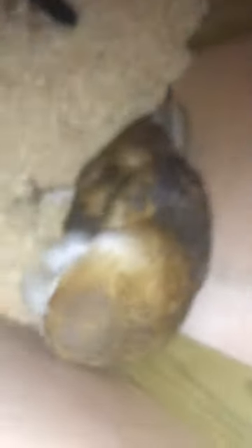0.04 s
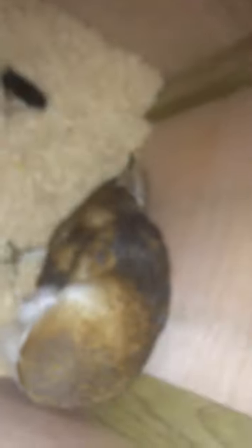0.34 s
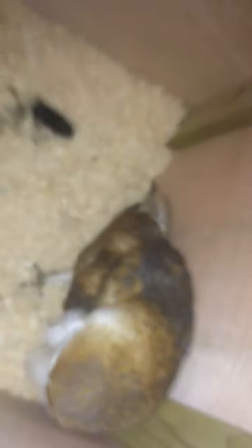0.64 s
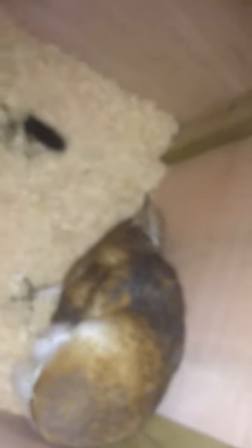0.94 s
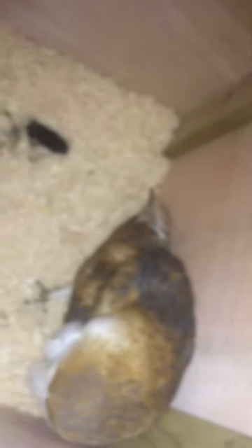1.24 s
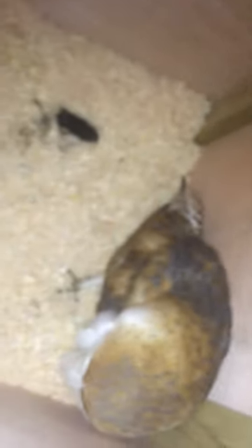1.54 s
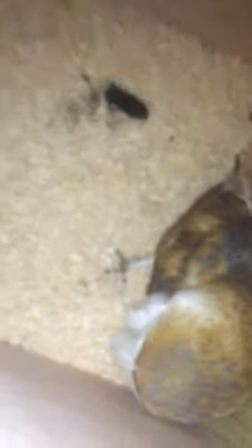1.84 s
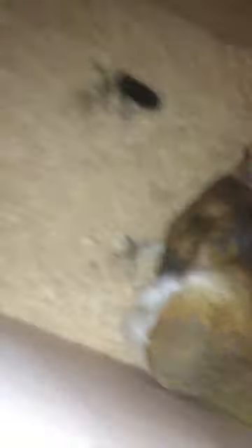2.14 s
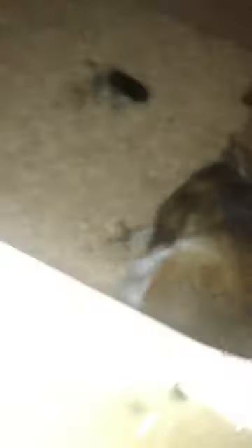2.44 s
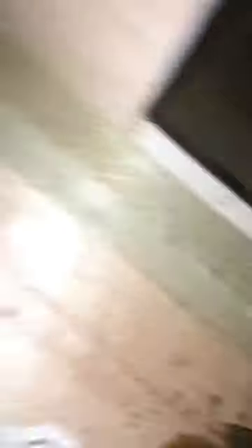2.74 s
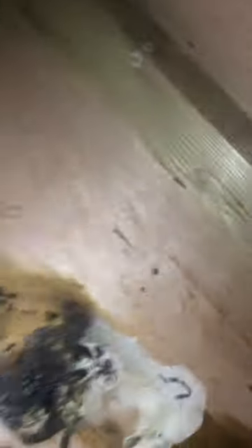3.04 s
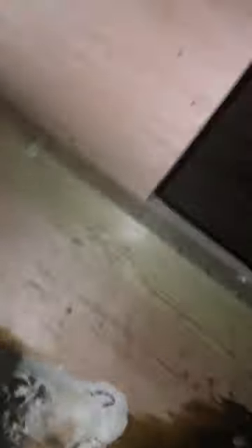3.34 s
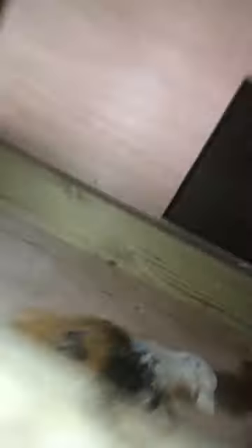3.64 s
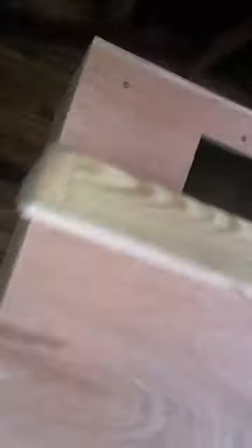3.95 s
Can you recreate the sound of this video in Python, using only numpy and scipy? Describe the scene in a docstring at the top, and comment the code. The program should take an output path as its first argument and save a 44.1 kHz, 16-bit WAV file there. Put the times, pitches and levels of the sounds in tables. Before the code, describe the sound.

A small camera bumps against a wooden box, heard very close on its own microphone. Sharp, ticking thuds come at about 0.7 and 1.0 seconds, and the hardest at 2.1 rings the box with a brief judder. A short scrape and tap follow near 2.8 seconds, then soft brushing from 3.3 to 3.6 and two dull bumps around 3.7 and 3.8. A quiet low rumble runs underneath.

```python
"""A small hand-held camera bumps against the boards as it is drawn out of a wooden nest box.
Heard very close, on the camera's own microphone: each bump thuds through the casing and rings the box,
and the harder ones make a loose part tick. The casing slips, taps and judders on the wood, scrapes past
the edge of the opening and is brushed near the microphone, over a low rumble and quiet air."""
import sys
import numpy as np
from scipy import signal
from scipy.fft import rfft, irfft
from scipy.io import wavfile
from scipy.ndimage import uniform_filter1d, map_coordinates

SR = 44100
rng = np.random.default_rng(int(sys.argv[2]) if len(sys.argv) > 2 else 0)


def to_wav(s):
    """Save 16-bit WAV."""
    ch = np.atleast_2d(s).T  # columns
    pcm = np.round(np.clip(ch, -1, 1) * 32767)  # PCM
    wavfile.write(sys.argv[1], SR, pcm.astype(np.int16))


N = 176400
TIME = np.arange(N) / SR

# resonances of the boards, rung by slips and ticks: (frequency [Hz], level [dB])
BOARD_MODES = [(575, 4), (890, 3.5), (1215, 3), (2500, -11.5), (2950, -4)]


def from_db(db):
    """Decibels to gain."""
    return 10 ** (np.asarray(db) / 20)


def rms_one(x):
    """Scale to unit rms."""
    return x / np.sqrt(np.mean(x ** 2) + 1e-20)


def level(rows, column=-1):
    """Gain along a dB column over time; silent outside it, but held if it ends near the scene's ends."""
    s, db = np.array(rows)[:, 0], np.array(rows)[:, column]
    before = db[0] if s[0] < .1 else -200
    after = db[-1] if s[-1] > 3.9 else -200
    return from_db(np.interp(TIME, s, db, left=before, right=after))


def coloured(x, colour, tilt_db=0):
    """Minimum-phase filter of unit power gain with the given spectrum, tilted by tilt_db an octave."""
    octave = np.log2(np.maximum(np.fft.rfftfreq(N, 1 / SR), 1))
    hz, db = np.transpose(colour)
    tilt = tilt_db * np.maximum(octave, np.log2(hz[0]))
    gain = rms_one(from_db(np.interp(octave, np.log2(hz), db) + tilt))
    cepstrum = irfft(np.log(gain + 1e-12), N)
    cepstrum[1:N // 2] *= 2
    cepstrum[N // 2 + 1:] = 0
    return irfft(rfft(x) * np.exp(rfft(cepstrum)), N)


def drift(rate_hz):
    """Smooth random wander of spread 1."""
    r = np.exp(-2 * np.pi * rate_hz / SR)
    return rms_one(signal.lfilter([1], [1, -2 * r, r * r], rng.standard_normal(N + SR))[SR:])


def friction(spread_db, clump_hz=184):
    """Dense tiny collisions, arriving in clumps."""
    return rms_one(rng.standard_normal(N) * from_db(spread_db * drift(clump_hz)))


def ring(x, hz, t60):
    """One resonance: a unit click sets a sine of height 1 ringing."""
    r, w = from_db(-60 / (t60 * SR)), 2 * np.pi * hz / SR
    return signal.lfilter([0, np.sin(w)], [1, -2 * r * np.cos(w), r * r], x + 1e-18)


def rasp(rub, modes, cycles):
    """Friction sets the wood ringing; each mode falls 60 dB in the given number of cycles."""
    return rms_one(sum(from_db(db) * rms_one(ring(rub, hz, cycles / hz)) for hz, db in modes))


def cavity(x, t60=0.07, echo_db=-5):
    """Inside the box: direct sound plus a dense, quickly dying echo between the boards."""
    age = TIME[:SR // 5]
    echo = rng.standard_normal(len(age)) * from_db(-60 * age / t60)
    echo /= np.sqrt(np.sum(echo ** 2))
    return rms_one(x + from_db(echo_db) * signal.fftconvolve(x, echo)[:N])


def background(boom_db=-56.5, air_db=-63):
    """The ambience at the box: a low rumble that swells and sinks, a steady hollow boom and quiet air."""
    # swells of the rumble: (time [s], level [dB])
    swells = [(0, -38), (0.12, -49), (0.24, -40), (0.42, -51), (0.62, -41.5), (0.95, -56.5), (1.25, -46),
              (1.38, -52), (1.58, -39.5), (1.72, -47), (1.9, -38), (2.0, -46), (2.28, -43), (2.5, -52),
              (4.0, -52)]
    # spectra of the rumble and the air: (frequency [Hz], level [dB])
    rumble_colour = [(30, -25), (42, -1.5), (51, 8), (63, -13), (105, -30.5), (1000, -110)]
    air_colour = [(30, 11.5), (200, -5), (275, 7.5), (325, -5.5), (390, 1.5), (550, -5), (720, -15),
                  (900, -6.5), (1200, -18), (2000, -22.5), (3300, -23), (5000, -26.5), (12500, -24.5)]
    rumble = coloured(rng.standard_normal(N), rumble_colour)
    rumble /= np.sqrt(uniform_filter1d(rumble ** 2, size=4000))   # evened out, so the swells lead
    boom = rms_one(ring(rng.standard_normal(N), hz=78.3, t60=0.31))
    air = coloured(rng.standard_normal(N), air_colour)
    return level(swells) * rumble + from_db(boom_db) * boom + from_db(air_db) * air


def slips(attack_s=0.004, release_s=0.0086, boards_db=-6):
    """Short dry rubs of the casing bring out the resonances of the boards."""
    # slips of the casing: (start [s], length [s], level [dB], tilt [dB per octave])
    slides = [(0.04, 0.043, -66.5, -1.3), (0.267, 0.044, -68, -1.5), (1.037, 0.02, -46.5, -2.5),
              (1.065, 0.093, -60.5, 0), (2.119, 0.067, -51.5, -1.5), (2.202, 0.033, -64.5, -1.4)]
    # spectrum of the rub: (frequency [Hz], level [dB])
    colour = [(200, 10.5), (600, -8), (1250, 1), (1800, -1), (4500, -7.5), (6000, -3), (10000, -13)]
    out = np.zeros(N)
    rub = cavity(friction(spread_db=2.5))
    boards = from_db(boards_db) * rasp(rub, BOARD_MODES, cycles=13.4)
    for s, length, db, tilt_db in slides:
        attack = np.clip((TIME - s) / attack_s, 0, 1)
        release = np.exp(-np.maximum(TIME - s - length, 0) / release_s)
        out += from_db(db) * attack * release * (coloured(rub, colour, tilt_db) + boards)
    return out


def taps(crackle=0.23, t60=0.015):
    """A corner touches the wood: a small click that crumbles away."""
    # light, dry touches: (time [s], level [dB])
    touches = [(0.1168, -47.5), (0.806, -55.5), (2.7871, -39)]
    # spectrum of a tap: (frequency [Hz], level [dB])
    colour = [(500, -6), (3400, 8), (5500, -6.5), (9500, 0.5), (13000, -16)]
    out, age = np.zeros(N), TIME[:SR // 20]
    for s, db in touches:
        start = int(s * SR)
        burst = crackle * rng.standard_normal(len(age)) * from_db(-60 * age / t60)
        burst[0] = 2   # the click
        out[start:start + len(age)] += from_db(db) * burst
    return coloured(out, colour)


def ticks(crackle=0.51, t60=0.0025, tail_t60=0.044, tail_db=-17, wood_db=-25, wood_cycles=16.3):
    """A loose part hits its stops: a hard click, a tiny crackle, a short tail and a ring of the wood."""
    # hits of the loose part in the camera: (time [s], level [dB])
    hits = [(0.7153, -24), (0.7207, -32), (0.7264, -22.5), (0.7353, -30.5), (1.0419, -31), (1.0495, -19),
            (1.059, -34), (2.1106, -16.5), (2.115, -30), (2.121, -25.5), (2.195, -43), (3.198, -43)]
    # spectrum of a tick: (frequency [Hz], level [dB])
    colour = [(500, -39), (1200, 17), (2100, -10), (3400, 7.5), (4700, 4), (6400, 6), (9000, 8),
              (12500, 10)]
    clicks, age = np.zeros(N), TIME[:SR // 10]
    decay = from_db(-60 * age / t60) + from_db(tail_db - 60 * age / tail_t60)
    for s, db in hits:
        start = int(s * SR)
        burst = crackle * rng.standard_normal(len(age)) * decay
        burst[0] = 2   # the click
        clicks[start:start + len(age)] += from_db(db) * burst
    top_mode_hz = BOARD_MODES[-1][0]
    wood = sum(ring(clicks, hz, wood_cycles / hz) * hz / top_mode_hz for hz, _ in BOARD_MODES)
    lowpass = signal.butter(2, 14000, fs=SR, output="sos")
    return signal.sosfilt(lowpass, coloured(clicks, colour)) + from_db(wood_db) * wood


def knocks(build_s=0.0018):
    """The struck spot of a board sounds a hollow note that builds while the casing presses, then dies."""
    # notes of the struck spots: (time [s], pitch [Hz], level [dB], t60 [s])
    notes = [(0.7155, 1199, -47, 0.04), (0.806, 1290, -61, 0.07), (1.039, 604, -36.5, 0.0266),
             (2.11, 885, -50, 0.02)]
    out = np.zeros(N)
    for s, hz, db, t60 in notes:
        age = np.maximum(TIME - s, 0)
        build = np.minimum(age / build_s, 1)
        fall_db = 60 * np.clip((age - build_s) / t60, 0, 2)
        out += build * from_db(db - fall_db) * np.sin(2 * np.pi * hz * age)
    return out


def thud(push, hz, width=0.64):
    """The casing answers a push with a dead thud of peak 1; its bandwidth is width times its pitch."""
    r = np.exp(-np.pi * width * hz / SR)
    body = signal.lfilter([1, 0, -1], [1, -2 * r * np.cos(2 * np.pi * hz / SR), r * r], push)
    body = signal.sosfilt(signal.butter(2, hz * .5, "high", fs=SR, output="sos"), body)
    return body / np.abs(body).max()


def bumps(lean_db=-6.5, lean_stretch=7.3, edge_low_hz=660):
    """A soft push thuds through the casing to the microphone; push and hard edge ring the box."""
    # bumps and rebounds:
    # (time [s], thud [dB], thud pitch [Hz], contact time [ms], push on the box [dB], hard edge [dB])
    blows = [(0.7164, -22, 105, 0.45, -34.5, -37), (0.748, -28.5, 71, 2.7, -49, -47),
             (1.0426, -16, 217, 0.3, -35.5, -38.5), (1.0720, -36, 93, 1.5, -34, -45),
             (2.1117, -15.5, 148, 0.79, -26.5, -30.5), (2.156, -27, 78, 3.15, -19.5, -41.5),
             (2.7912, -31.5, 80, 1.26, -63, -53.5), (3.687, -27.5, 162, 0.54, -61, -77),
             (3.8180, -31.5, 73, 0.68, -46, -77)]
    # modes of the box: (frequency [Hz], level [dB], t60 [s])
    box_modes = [(58.6, 7.5, 0.25), (81, 4.5, 0.19), (244, 9.5, 0.093), (297, 0.5, 0.19), (399, -5, 0.18),
                 (457.3, -5, 0.21), (638, -16, 0.097), (923, -12, 0.064), (1229, -21.5, 0.17)]
    thuds, pushes, edges, box = np.zeros((4, N))
    for s, thud_db, hz, contact_ms, push_db, edge_db in blows:
        contact_age = (TIME - s) / (contact_ms / 1000)
        blow = np.exp(-.5 * contact_age ** 2)
        lean = np.exp(-.5 * (contact_age / lean_stretch) ** 2)   # a softer, longer push around the blow
        push = blow + from_db(lean_db) * lean
        push = push / push.sum() + 1e-18
        thuds += from_db(thud_db) * thud(push, hz)
        pushes += from_db(push_db) * push
        edges[int(s * SR)] = from_db(edge_db)
    for k, (hz, db, t60) in enumerate(box_modes):
        drive = pushes + edges * min(hz / edge_low_hz, 1)   # a hard edge rings mainly the upper modes
        box += (-1) ** k * from_db(db) * ring(drive, hz, t60)
    return thuds + box


def judder(wobble=0.043, overtone_db=-16):
    """After the hardest bump the casing sticks and slips briefly, near a resonance of the box."""
    # course of the stick-slip: (time [s], pitch [Hz], level [dB])
    course = [(2.119, 330, -54), (2.133, 337.6, -23.5), (2.138, 261.4, -33), (2.149, 269.5, -26),
              (2.158, 287, -38.5), (2.222, 290, -51.5)]
    s, hz, _ = np.transpose(course)
    pitch = np.interp(TIME, s, hz) * (1 + wobble * drift(rate_hz=124))
    phase = 2 * np.pi * np.cumsum(pitch) / SR
    return level(course) * (np.sin(phase) + from_db(overtone_db) * np.sin(2 * phase))


def handling():
    """Right by the microphone: bright brushing that grates as it takes hold, and a dull shifting grip."""
    # courses of the three rubs on the casing: (time [s], level [dB])
    brush_levels = [(2.65, -90), (2.97, -75), (3.09, -66), (3.285, -64.5), (3.325, -54.5), (3.375, -50),
                    (3.44, -51), (3.565, -59), (3.59, -70.5), (3.75, -71.5), (3.87, -59), (3.95, -65.5)]
    grate_levels = [(3.27, -70.5), (3.335, -57), (3.46, -63.5), (3.56, -75)]
    grip_levels = [(2.4, -79), (2.75, -62), (3.0, -59), (4.0, -59)]
    # their spectra: (frequency [Hz], level [dB])
    brush_colour = [(1200, -2), (4800, -5), (7000, 1.5), (9000, 3), (14000, 3.5)]
    grate_colour = [(500, -2), (1500, 4), (2400, 1), (5000, -7.5)]
    grip_colour = [(40, -6), (80, -2), (140, 2), (200, -6), (290, -3.5), (450, -17), (2500, -25),
                   (8000, -31)]
    brush = level(brush_levels) * coloured(friction(spread_db=1.45), brush_colour)
    grate = level(grate_levels) * coloured(friction(spread_db=2.5), grate_colour)
    grip = level(grip_levels) * coloured(friction(spread_db=1.45), grip_colour)
    return brush + grate + grip


def scrape(pitch_wander=0.016):
    """The casing grates past the edge of the opening, whose resonances waver as the contact moves."""
    # the edge sings as the pressure builds: (time [s], dry rub [dB], ringing of the edge [dB])
    course = [(2.69, -81, -79), (2.73, -58.5, -59), (2.741, -49, -56), (2.756, -51.5, -52),
              (2.774, -51.5, -51), (2.797, -54, -50.5), (2.82, -84, -78)]
    # spectrum of the dry rub: (frequency [Hz], level [dB])
    colour = [(150, 9.5), (400, 6.5), (900, 4.5), (1500, 0), (4500, -0.5), (7000, -9.5), (16000, -10.5)]
    # resonances of the edge: (frequency [Hz], level [dB])
    edge_modes = [(400, 10), (883, 7), (1250, -7), (2130, -3), (2400, 0), (3060, 8.5), (3330, 2),
                  (4080, -8), (6860, 2)]
    rub = cavity(friction(spread_db=2.5))
    warped_samples = np.arange(N) + np.cumsum(pitch_wander * drift(rate_hz=25.5))
    singing = map_coordinates(rasp(rub, edge_modes, cycles=53), [warped_samples], mode="mirror")
    return level(course, column=1) * coloured(rub, colour) + level(course, column=2) * singing


def scene():
    """Everything reaches the one microphone of the camera, in mono."""
    impacts = bumps() + knocks() + taps() + ticks()
    return (impacts + slips() + judder() + scrape() + handling() + background())[None]


def record(dry, low_cut_hz=36, high_cut_hz=16100):
    """The microphone loses the deepest bass; the top is cut steeply."""
    low_cut = signal.butter(3, low_cut_hz, "high", fs=SR, output="sos")
    high_cut = signal.ellip(10, .2, 70, high_cut_hz, fs=SR, output="sos")
    return signal.sosfilt(high_cut, signal.sosfilt(low_cut, dry))


dry = scene()
out = record(dry)
to_wav(out)
```